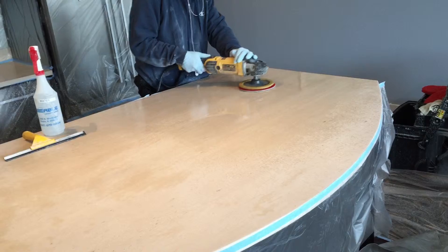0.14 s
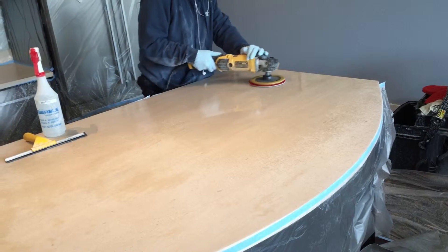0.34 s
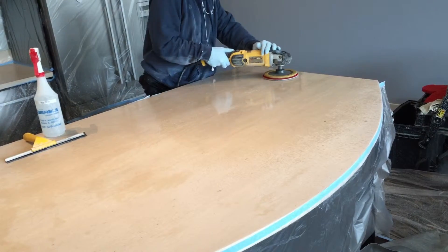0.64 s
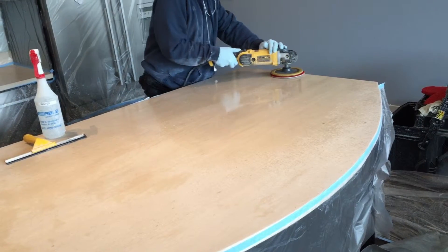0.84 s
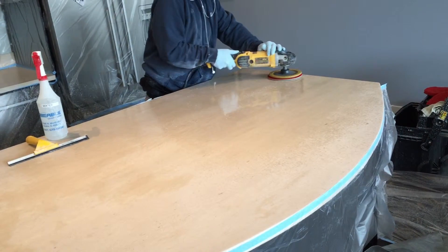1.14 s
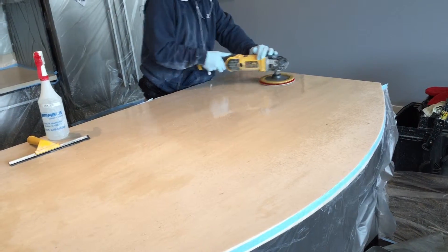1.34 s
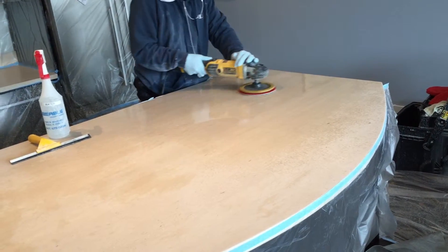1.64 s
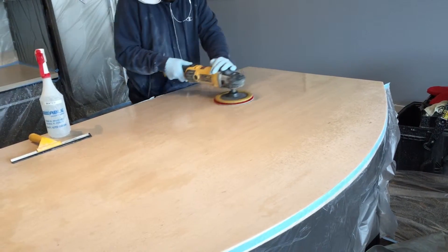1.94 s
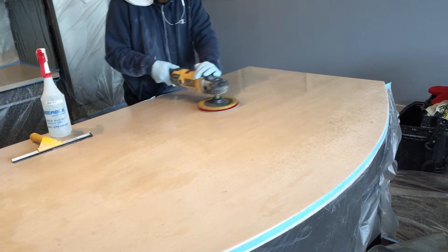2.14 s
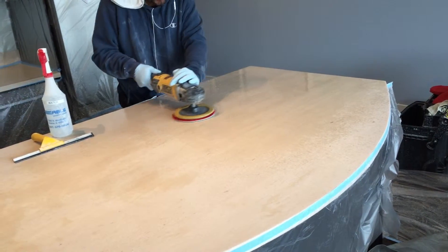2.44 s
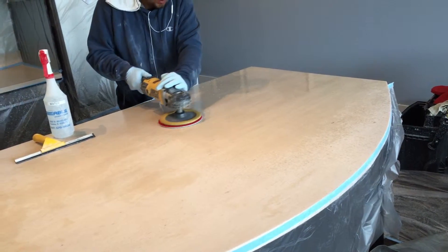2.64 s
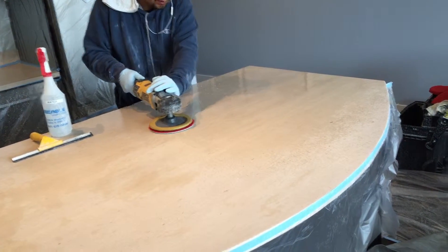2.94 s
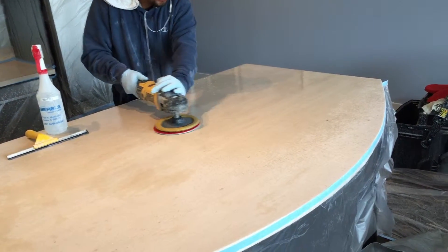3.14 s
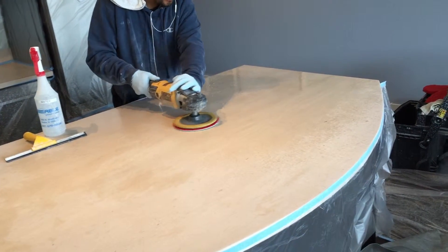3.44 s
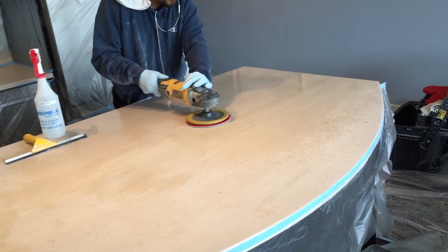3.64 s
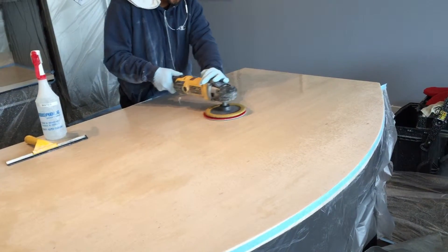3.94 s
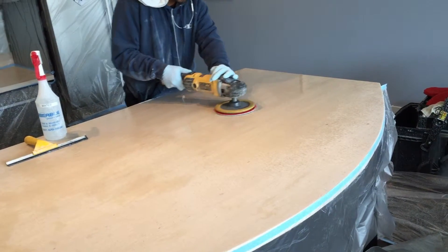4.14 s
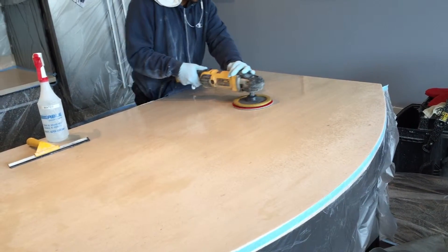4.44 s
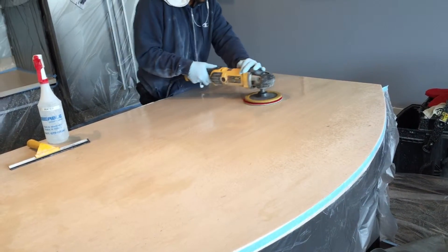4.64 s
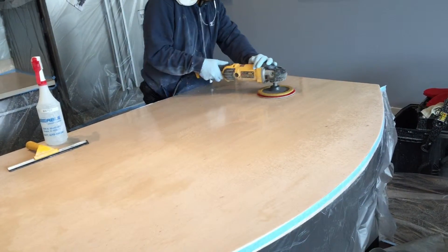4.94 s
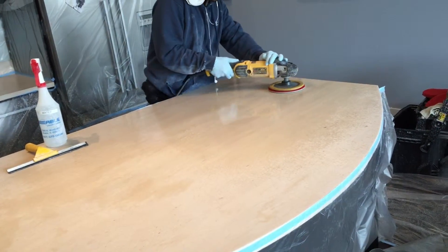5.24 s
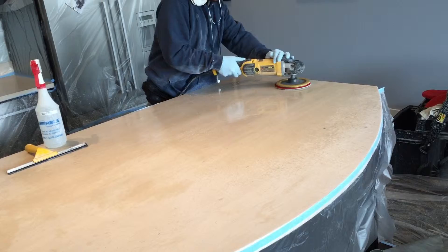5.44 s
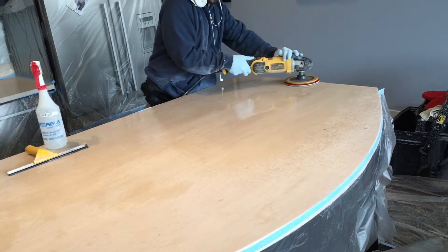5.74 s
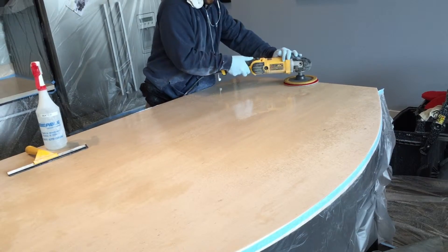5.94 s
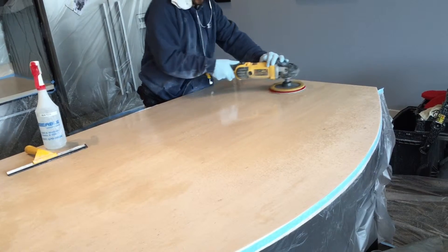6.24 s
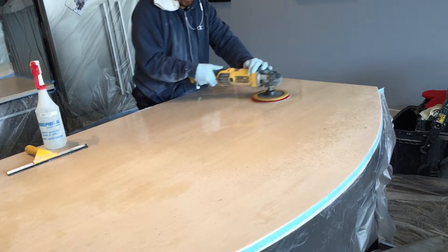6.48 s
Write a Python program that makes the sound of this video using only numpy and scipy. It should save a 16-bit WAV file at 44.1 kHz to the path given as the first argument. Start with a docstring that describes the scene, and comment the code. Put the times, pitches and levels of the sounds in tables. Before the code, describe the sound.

A handheld electric polisher runs on a stone countertop in a bare room, its high motor whine fluttering over a steady rush of air. Past the middle, the pad drags harder, raising a gritty hiss and hollow growl that slowly fade. Grit ticks briefly, then the pad bites again near the end. Faint thuds, hum and rumble lie underneath, all picked up by one microphone.

```python
"""A handheld polisher works a stone countertop in a bare room. From the start its motor and gears whine,
wavering around a set speed, over fan and brush noise, mains hum and a low rumble. Three soft thuds come
early on. Near 4 s the pad drags harder: a broad hiss swells with a hollow growl, then slowly fades.
Two more thuds follow, grit ticks under the pad just before 6 s, and at 6.3 s the pad bites again.
One microphone feeds both channels."""
import sys
import numpy as np
from scipy import signal
from scipy.fft import rfft, irfft, next_fast_len
from scipy.io import wavfile
from scipy.ndimage import uniform_filter1d

SR = 44100
rng = np.random.default_rng(int(sys.argv[2]) if len(sys.argv) > 2 else 0)


def master(y):
    """Save y as 16-bit WAV."""
    cut = np.clip(np.atleast_2d(y).T, -1, 1)
    pcm = np.round(cut * 32767)  # scale
    wavfile.write(sys.argv[1], SR, pcm.astype(np.int16))


N = 291501

# Motor speed. Each row: time in seconds, shaft turns per second.
SHAFT_SPEED = [(0.0, 92.4), (0.09, 92.3), (0.19, 93.2), (0.25, 92.2), (0.32, 91.7), (0.41, 93.7),
               (0.49, 92.8), (0.67, 93.7), (0.81, 93.8), (1.05, 91.6), (1.11, 91.9), (1.16, 92.8),
               (1.28, 93.0), (1.33, 93.7), (1.42, 93.4), (1.48, 93.7), (1.55, 93.1), (1.88, 92.3),
               (2.02, 93.6), (2.1, 92.8), (2.34, 91.9), (2.65, 92.4), (2.72, 91.9), (2.83, 92.9),
               (2.95, 92.5), (3.11, 93.3), (3.17, 94.1), (3.3, 94.0), (3.38, 94.5), (3.44, 95.4),
               (3.56, 94.1), (3.71, 94.6), (3.83, 92.6), (4.04, 94.3), (4.1, 93.6), (4.24, 93.7),
               (4.3, 93.0), (4.59, 94.3), (4.71, 92.5), (5.0, 93.2), (5.15, 92.2), (5.27, 93.4),
               (5.4, 92.1), (5.5, 92.4), (5.59, 93.3), (5.75, 93.1), (5.9, 93.5), (6.03, 91.8),
               (6.09, 93.1), (6.15, 93.4), (6.42, 94.0), (6.61, 93.3)]
# The whine's tones. Each row: order (pitch as a multiple of the shaft speed), relative level in dB.
WHINE_TONES = [(10, -60), (14, -51), (15, -56.5), (16, -56), (17, -44.5), (19, -43.5), (24, -40.5),
               (25, -30.5), (26, -35.5), (27, -49), (29, -39), (30, -47.5), (31, -38.5), (32, -51),
               (33, -51.5), (35, -42.5), (36, -41.5), (37, -45), (38, -47), (39, -54), (41, -43.5),
               (43, -47.5), (47, -42.5), (48, -47.5), (49, -50), (54, -52.5), (59, -56.5), (60, -63),
               (65, -52.5), (67, -65), (96, -61), (100, -66)]
# The strongest tone flutters, rising and dipping in loudness. Each row: time in seconds, gain in dB.
FLUTTER = [(0.03, 1.5), (0.29, -2.5), (0.42, -1), (0.54, 3.5), (0.74, -6.5), (1.04, 2.5), (1.27, 0),
           (1.42, 5), (1.49, -12), (1.54, 8.5), (1.73, -8), (1.81, 3), (1.88, -7), (1.94, -3), (2.0, -3),
           (2.08, 2), (2.13, -15), (2.2, -5), (2.29, -11), (2.34, 3), (2.51, -12), (2.59, 3.5), (2.71, -16),
           (2.78, 8), (2.84, -19), (2.97, -1), (3.03, 2), (3.11, 4.5), (3.16, -7), (3.32, 7.5), (3.43, 2.5),
           (3.6, -1.5), (3.79, 7), (3.88, -11), (3.97, 2), (4.06, -2.5), (4.16, 6), (4.35, -10), (4.44, 5),
           (4.54, 6.5), (4.62, -7), (4.74, -1), (4.82, -7), (4.87, 0), (5.04, -7), (5.51, 1), (5.58, -2),
           (6.03, 0), (6.1, -5), (6.28, 1.5), (6.56, 1)]
# The tool tilts. Each row: time in seconds, then gains in dB for order 24, order 26 and the low orders.
TILT_GAINS = [(0, 4, 4, 0), (.5, -7, 2, -0.5), (.8, -10, -2, 4), (.97, -3, -1, 0), (1.08, 10, 5, -3),
              (1.2, -13, -3, -1), (1.5, -14, 0, 2), (1.9, -2, 1, -2.5), (2.4, 3.5, 3, 0.5), (2.8, 2, 1, -1),
              (3.3, -2, -1, -2), (3.8, -4, -1, 1), (4.2, 5, 2, 0.5), (4.55, -7, -6, 1.5), (4.9, 1, 0, 1.5),
              (5.4, 1, 0, 3), (5.85, -1, -3, -1.5), (6.3, 6, -3, 0.5), (6.61, -6, -2, 4)]
# The tool turns its vents. Each row: time in seconds, then a gain in dB for each group below.
VENT_GAINS = [(0, 0, -7, 5, -2), (.9, -2, -1, -3, -12), (1.6, 0.5, -5, -10, -1), (2.1, -2.5, 0, 11, 4),
              (2.7, -3, 0.5, 2, 4), (3.1, 1.5, 0, 3, 7.5), (3.7, -3, 2.5, 6, 5), (4.4, -5.5, 0.5, 7, 4),
              (5.2, 1, -1.5, 9, -11), (5.9, 1, -0.5, 0, -6), (6.61, -9, 0, 7, 5)]
# The four groups: orders 29-31, 47-54, 59-60 and 96-100.
VENT_ORDERS = [range(29, 32), range(47, 55), range(59, 61), range(96, 101)]
# Pad chatter. Each row: middle in seconds, order, relative level in dB, half length in seconds.
CHATTERS = [(.5, 6, -60, 0.17), (1.5, 7, -55, 0.14), (2.602, 6, -57, 0.29), (6.04, 6, -54, 0.12),
            (6.333, 7, -45.5, 0.063), (6.34, 9, -47, 0.047), (6.575, 11, -38, 0.017)]
# Fan and brush noise through the housing. Each row: frequency in Hz, relative level in dB.
RUSH_SPECTRUM = [(200, -54), (330, -30.5), (480, -25.5), (580, -18), (760, -23), (1150, -19), (2120, -8.5),
                 (2330, -2), (2560, -2), (2800, -9.5), (3400, -9), (3650, -14.5), (3900, -13.5),
                 (4180, -14.5), (4500, -13), (4750, -22.5), (5300, -22.5), (6000, -19.5), (6850, -21),
                 (7600, -30), (8600, -27), (9350, -27.5), (10350, -37), (11000, -35), (16000, -38.5)]
# The pad bites. Each row: time of full bite in seconds, rise in dB per second, hiss level in dB,
# the hollow part's level in dB, its head start in seconds, its later drop in dB, low body level in dB.
BITES = [(3.945, 168, -31, -31.5, 0.021, 5.5, -68), (6.34, 125, -28, -31.5, 0.041, 4, -45)]
# The dragging pad's hiss and its hollow part. Each row: frequency in Hz, relative level in dB.
HISS_SPECTRUM = [(300, -22), (500, -14), (700, -26), (3000, 0), (5500, -6.5), (9000, -10.5), (11000, -15),
                 (16000, -20)]
HOLLOW_SPECTRUM = [(350, -55), (600, -14.5), (780, -16), (920, -10.5), (1230, -12), (1400, -3.5),
                   (1590, 2.5), (1800, -7.5), (2100, -2.5), (3000, -61)]
# Pad growls. Each row: middle in seconds, pitch in Hz, level in dB, half length in seconds.
GROWLS = [(3.965, 1535, -40, 0.023), (4.0, 1620, -46, 0.054), (4.054, 1597, -33, 0.017),
          (4.18, 1567, -37, 0.019), (6.316, 1450, -36, 0.026), (6.33, 1574, -41, 0.053),
          (6.43, 1680, -39, 0.036), (6.554, 1617, -38, .04)]
# Grit under the pad. Each row: start in seconds, level in dB.
GRIT_TICKS = [(5.855, -28), (5.863, -33), (5.868, -35)]
# Soft thuds. Each row: start in seconds, level in dB, pitch in Hz, seconds to fade by 60 dB.
THUDS = [(.15, -49.5, 197, 0.76), (.62, -49, 92.5, 0.3), (1.09, -50, 60, 0.34), (5.025, -44.5, 194, 0.48),
         (5.735, -45, 85, 0.58)]
# Hum as the tool travels. Each row: time in seconds, then levels in dB at 120, 240 and 360 Hz.
HUM_LEVELS = [(0.0, -58, -87, -57), (0.25, -54.5, -64, -56), (0.85, -64.5, -72, -62), (1.15, -78, -55, -66),
              (1.45, -68, -59, -62.5), (1.95, -61, -65, -57.5), (2.4, -60.5, -66, -63),
              (2.6, -58, -63, -66), (3.15, -58, -68.5, -76.5), (3.6, -57, -71, -58), (3.8, -57, -79, -59.5),
              (4.95, -57.5, -69, -56), (5.4, -65, -77, -61), (5.98, -70, -56, -64), (6.2, -45, -56, -53.5),
              (6.38, -50, -57.5, -58), (6.61, -74, -65, -53)]
# Upper hum. Each row: multiple of 120 Hz, level in dB.
BUZZ_TONES = [(6, -69), (7, -63.5), (9, -63)]
# The rumble and the room's background noise. Each row: frequency in Hz, relative level in dB.
RUMBLE_SPECTRUM = [(25, -45), (42, -17), (52, 16), (62, -17), (100, -51)]
ROOM_TONE_SPECTRUM = [(20, -60), (45, -18), (75, -6.5), (130, 0), (200, -6.5), (310, -5.5), (500, -17)]
# Strength of that background noise. Each row: time in seconds, level in dB.
ROOM_TONE_LEVEL = [(0, -58), (.9, -52), (1.1, -57), (2.4, -54.5), (3.1, -55.5), (3.7, -54.5), (3.95, -55),
                   (6.61, -51)]
# The room's echo. Each row: frequency in Hz, seconds to fade by 60 dB.
ECHO_DECAY = [(150, 0.17), (2000, 1), (12000, 0.077)]

MAIN_ORDER, LOW_ORDERS, HIGH_ABOVE = 25, range(14, 20), 45
MAINS_PULSE_HZ = 120
TIME = np.arange(N) / SR  # seconds


def polisher():
    """The motor hunts around its set speed; one shaft drives the whine, the chatter and the fan."""
    speed = curves(SHAFT_SPEED)[0] + 0.1213 * wobble(12)
    turns = np.cumsum(speed) / SR
    mains_phase = 2 * np.pi * MAINS_PULSE_HZ * TIME
    return whine(turns, mains_phase) + pad_chatter(turns) + fan_and_brushes(turns, mains_phase)


def whine(turns, mains_phase):
    """Motor contacts and gear teeth sing at multiples of the shaft speed, each tone fading on its own."""
    below_db, above_db, low_db = curves(TILT_GAINS)
    steered = {MAIN_ORDER - 1: below_db, MAIN_ORDER: curves(FLUTTER)[0], MAIN_ORDER + 1: above_db}
    for group, gain_db in zip([LOW_ORDERS, *VENT_ORDERS], [low_db, *curves(VENT_GAINS)]):
        steered.update({order: gain_db for order in group})
    out = np.zeros(N)
    for order, db in WHINE_TONES:
        high = order > HIGH_ABOVE
        move_db = steered.get(order, np.minimum(3 * wobble(5), 2.5))  # the rest drift at random
        if order == MAIN_ORDER:
            fade_db = 1.3 * wobble(25)
        else:
            fade_db = np.minimum(2.2 * wobble(10) + (3 if high else 1.8) * wobble(28), 3.5)
            fade_db *= .6 if order in LOW_ORDERS else 1
        # The geared-down spindle loads the teeth unevenly, once in four turns.
        fade_db += 2.1 * np.cos(2 * np.pi * (turns / 4 + rng.random()))
        # Mains pulses shake each tone, adding faint ones 120 Hz away; high tones also flicker.
        shake = .3 * np.sin(mains_phase) + high * 1.1 * order / HIGH_ABOVE * wobble(45)
        if abs(order - MAIN_ORDER) > 1:
            offset = rng.random()
        else:  # the main tone and its two neighbours stay near step and rattle once a turn
            offset = .13 * (order != MAIN_ORDER) * wobble(3)
        out += tone(db + move_db + fade_db, order * turns + offset, shake)
    return out


def pad_chatter(turns):
    """Low, rough tones swell briefly as the pad chatters."""
    out = np.zeros(N)
    for middle, order, db, half_length in CHATTERS:
        swell_db = db - 2.9 * ((TIME - middle) / half_length) ** 2
        out += tone(swell_db + 4.9 * wobble(35), order * turns, 1.6 * wobble(45))
    return out


def fan_and_brushes(turns, mains_phase):
    """A rush that throbs once and twice a turn and with the mains; three bands waver separately."""
    angle = 2 * np.pi * turns
    throb = 1 + 0.049 * np.cos(angle) + 0.1 * np.cos(2 * angle + 2.0) + 0.016 * np.cos(mains_phase)
    body_gain, treble_gain, top_gain = amp(.6 * wobble(9)), amp(.8 * wobble(14)), amp(.9 * wobble(14))
    rush = rush_streaks(noise(RUSH_SPECTRUM, throb), depth_db=2.2)
    treble = filtered(rush, lambda hz: 1 / (1 + (5200 / (hz + 1)) ** 6))
    top = filtered(rush, lambda hz: 1 / (1 + (8000 / (hz + 1)) ** 8))
    return amp(-28) * (body_gain * (rush - treble) + treble_gain * (treble - top) + top_gain * top)


def rush_streaks(sound, depth_db):
    """Narrow bands of the rush briefly rise and dip at random, a metallic wavering."""
    bands = signal.stft(sound, nperseg=2048)[2]
    streaks = uniform_filter1d(rng.standard_normal(bands.shape), size=3, axis=0)
    streaks = unit(uniform_filter1d(streaks, size=3, axis=1))
    return unit(signal.istft(bands * amp(depth_db * streaks), nperseg=2048)[1][:N])


def pad_drag():
    """The pad bites: a gritty hiss, a hollow part that peaks, settles and lingers, and a low body."""
    out = np.zeros(N)
    for bite, rise, hiss_db, hollow_db, lead, drop_db, body_db in BITES:
        age = TIME - bite
        grit = amp(1.1 * wobble(300) + 0.78 * wobble(17))
        out += amp(hiss_db + bite_db(age, rise)) * noise(HISS_SPECTRUM, grit)
        settle_db = drop_db * np.clip((age + lead - 0.15) / 0.072, 0, 1)
        shape_db = bite_db(age + lead, rise, hold_s=1.0) - settle_db
        out += amp(hollow_db + shape_db + 0.51 * wobble(12)) * noise(HOLLOW_SPECTRUM)
        out += amp(body_db + bite_db(age + 0.15, rise)) * noise(ROOM_TONE_SPECTRUM)
    return out


def bite_db(age, rise_db_per_s, hold_s=0.3, fall_db_per_s=13):
    """The shape of one bite: a steep rise, a hold, a slow release."""
    return rise_db_per_s * np.minimum(age, 0) - fall_db_per_s * np.maximum(age - hold_s, 0)


def pad_growls():
    """The dragging pad growls in short, rough notes whose pitch and strength shake."""
    out = np.zeros(N)
    for middle, hz, db, half_length in GROWLS:
        swell_db = db - 3 * ((TIME - middle) / half_length) ** 2
        out += tone(swell_db + 1.8 * wobble(50), hz * TIME, .5 * wobble(40))
    return out


def grit_ticks():
    """Each speck of grit makes a sharp snap of hiss with a short, quieter tail."""
    hiss = noise([(2000, -28), (4500, 3), (10000, -9), (16000, -16)])
    out = np.zeros(N)
    for start, db in GRIT_TICKS:
        age = np.maximum(TIME - start, 0)
        snap, tail = amp(db - 60 * age / 0.012), amp(db - 14 - 60 * age / 0.34)
        out += (age > 0) * (snap + tail) * hiss
    return out


def thuds():
    """Dull bumps: a wide band of noise around a pitch, dying fast."""
    out = np.zeros(N)
    for start, db, hz, fade_s in THUDS:
        age = np.maximum(TIME - start, 0)
        shape = amp(db - 60 * age / fade_s) * (1 - np.exp(-age / 0.0075))
        out += shape * noise([(hz / 6.9, -25), (hz, 0), (hz * 3.3, -22), (hz * 4, -60)])
    return out


def mains_hum(beat_hz=11.4):
    """The mains hums in wavering tones; the lowest beats with a slow rotation."""
    beat = 1 + .5 * np.cos(2 * np.pi * beat_hz * TIME)
    out = np.zeros(N)
    for multiple, db in [*enumerate(curves(HUM_LEVELS), start=1), *BUZZ_TONES]:
        waver_db = (1 if multiple == 1 else 2.8) * wobble(9) + (multiple > 3) * 4.5 * wobble(2.5)
        hum = tone(db + waver_db, multiple * MAINS_PULSE_HZ * TIME + rng.random(), .4 * wobble(9))
        out += hum * (beat if multiple == 1 else 1)
    return out


def background():
    """A deep rumble and the room's soft noise, both gently wavering."""
    rumble = amp(-65 + 2.5 * wobble(6)) * noise(RUMBLE_SPECTRUM)
    room_tone = amp(curves(ROOM_TONE_LEVEL)[0] + 1.5 * wobble(3)) * noise(ROOM_TONE_SPECTRUM)
    return rumble + room_tone


def room_echo(sound):
    """Each band dies at its own speed; the tool moves, so each stretch gets a new echo pattern."""
    hop, out = SR // 5, np.zeros(N + 2 * SR)
    padded = np.pad(sound, (hop, 2 * hop))
    window = np.sin(np.pi * np.arange(2 * hop) / (2 * hop))
    for start in range(0, N + hop, hop):
        hz, age, bands = signal.stft(rng.standard_normal(SR // 2), SR, nperseg=256)
        decay = amp(-60 * age / along(ECHO_DECAY, hz)[:, None])
        tail = signal.istft(bands * decay, SR, nperseg=256)[1]
        echo = signal.fftconvolve(padded[start:start + 2 * hop] * window, tail / np.linalg.norm(tail))
        out[start:start + len(echo)] += echo
    return out[hop:hop + N]


def amp(db):
    """Turn decibels into a gain."""
    return 10 ** (np.asarray(db) / 20)


def unit(x):
    """Scale x to an average (rms) strength of 1."""
    return x / np.sqrt(np.mean(x ** 2) + 1e-20)


def tone(db, cycles, shake):
    """A sine wave from a running count of cycles, its phase nudged by shake (radians)."""
    return amp(db) * np.sqrt(2) * np.sin(2 * np.pi * cycles + shake)


def along(points, hz):
    """Read between (Hz, value) points on a log frequency scale."""
    point_hz, values = np.transpose(points)
    return np.interp(np.log(hz + 1), np.log(point_hz + 1), values)


def curves(rows):
    """One value per sample for each column after the time."""
    times, *columns = np.transpose(rows)
    return [np.interp(TIME, times, column) for column in columns]


def wobble(rate):
    """A curve through random points, rate of them a second."""
    points = rng.standard_normal(int(N * rate / SR) + 2)
    return np.interp(np.arange(N) * rate / SR, np.arange(len(points)), points)


def filtered(x, response):
    """Scale each frequency in x by response(hz)."""
    size = next_fast_len(N + 8192)
    return irfft(rfft(x, size) * response(np.fft.rfftfreq(size, 1 / SR)), size)[..., :N]


def noise(spectrum, pulse=1):
    """Noise of strength 1, first pulsed, then shaped by (Hz, dB) points."""
    return unit(filtered(pulse * rng.standard_normal(N), lambda hz: amp(along(spectrum, hz))))


def scene():
    """The tool and its echo, the pad's noises and the background, alike in both channels."""
    tool = polisher()
    mono = amp(-1.5) * tool + amp(-16.5) * room_echo(tool)
    mono += pad_drag() + pad_growls() + grit_ticks()
    mono += background() + mains_hum() + thuds()
    return np.array([mono, mono])


def record(dry, bass_hz=36, top_hz=15420):
    """The microphone loses the deepest bass and keeps nothing above top_hz."""
    return filtered(dry, lambda hz: (hz < top_hz) / np.sqrt(1 + (bass_hz / (hz + 1)) ** 6))


dry = scene()
out = record(dry)
master(out)
```